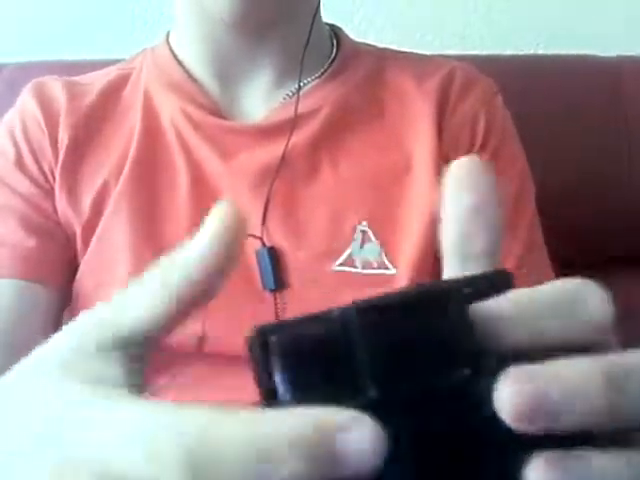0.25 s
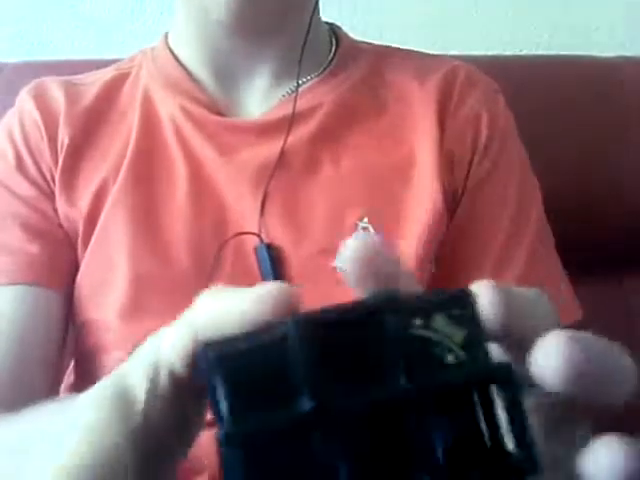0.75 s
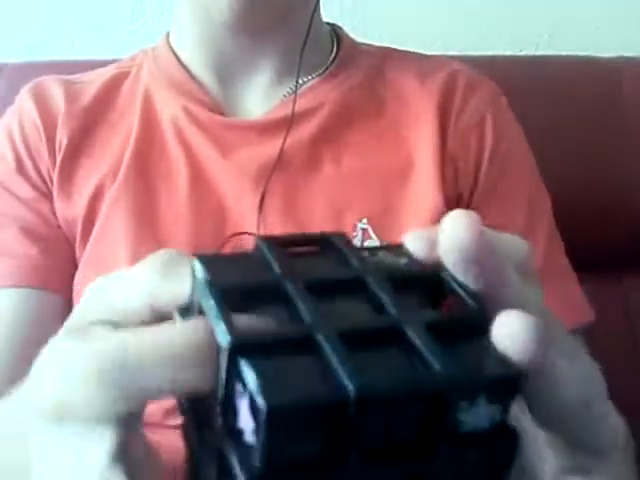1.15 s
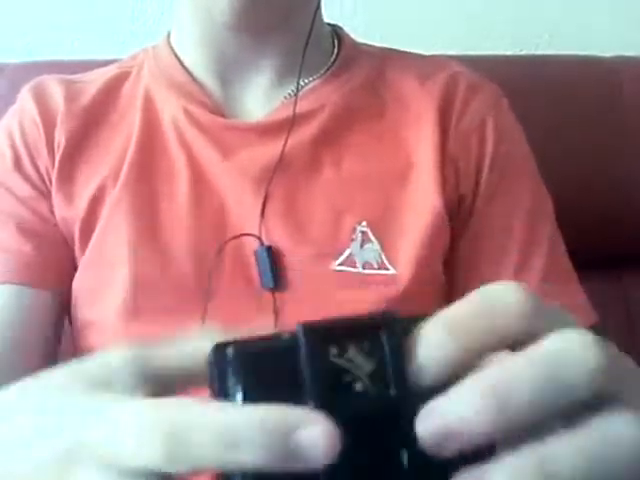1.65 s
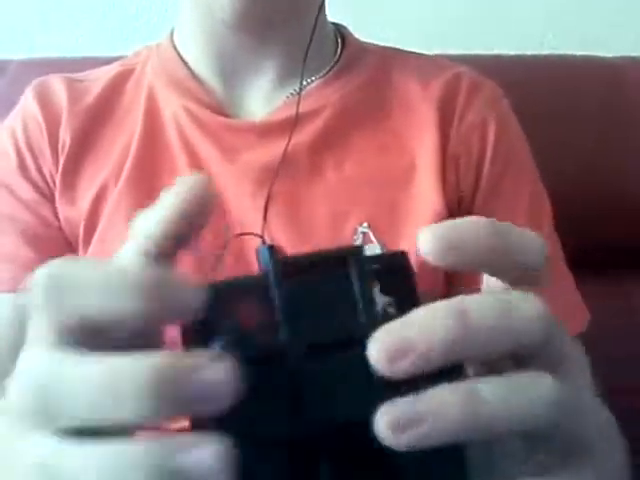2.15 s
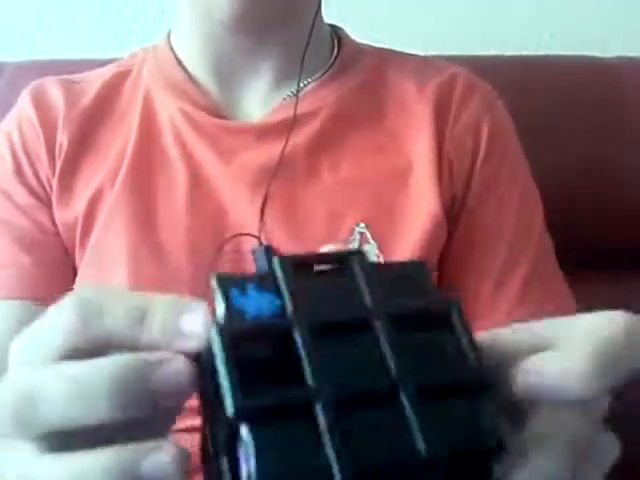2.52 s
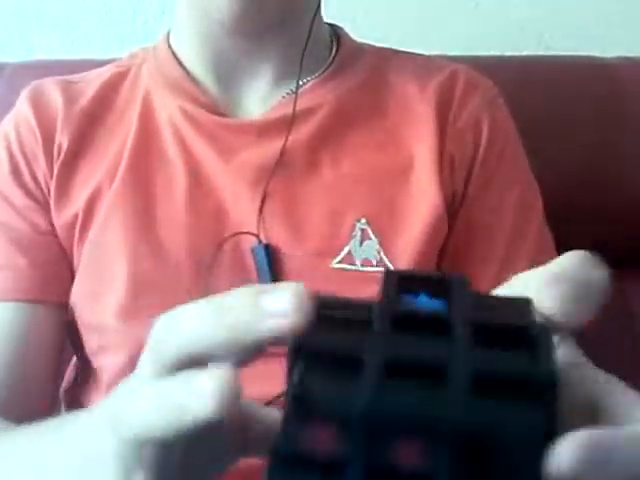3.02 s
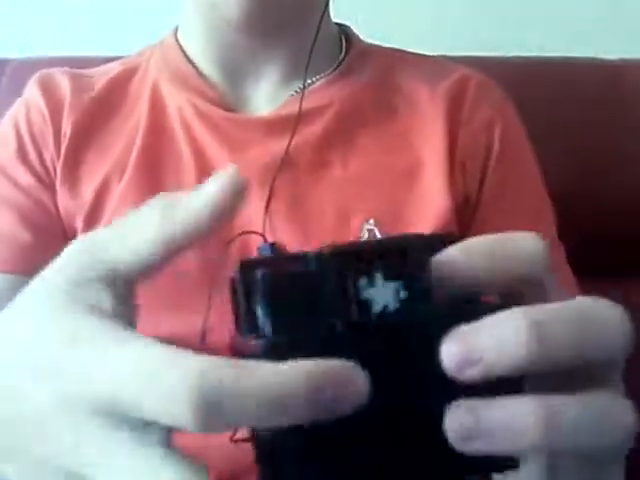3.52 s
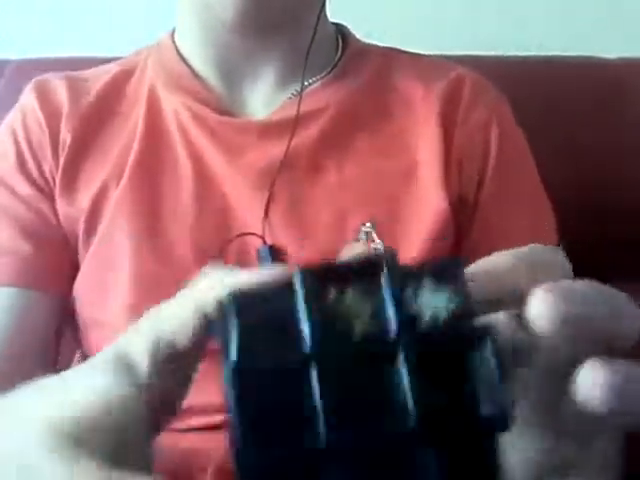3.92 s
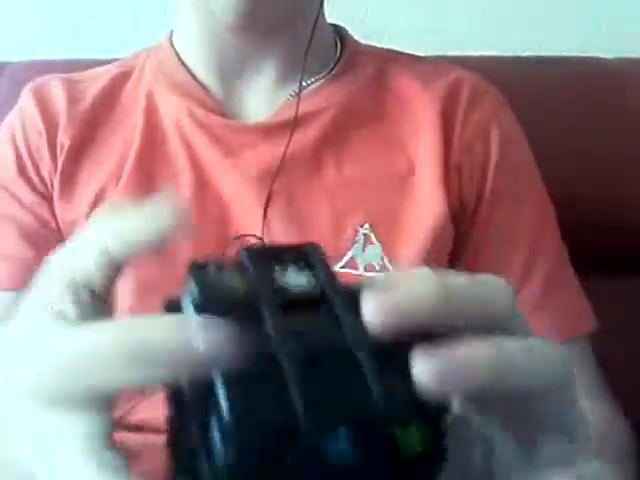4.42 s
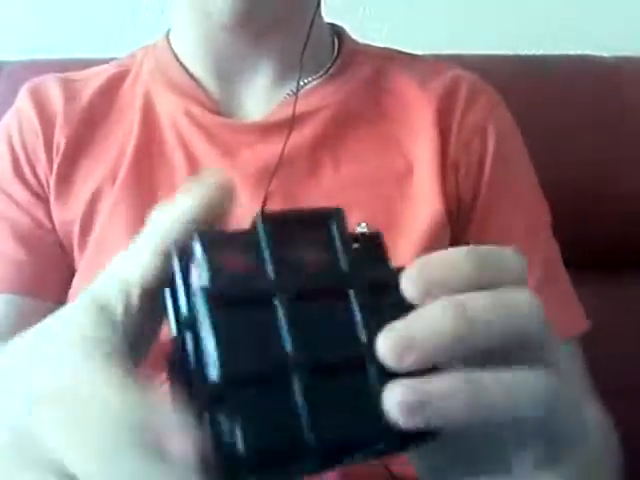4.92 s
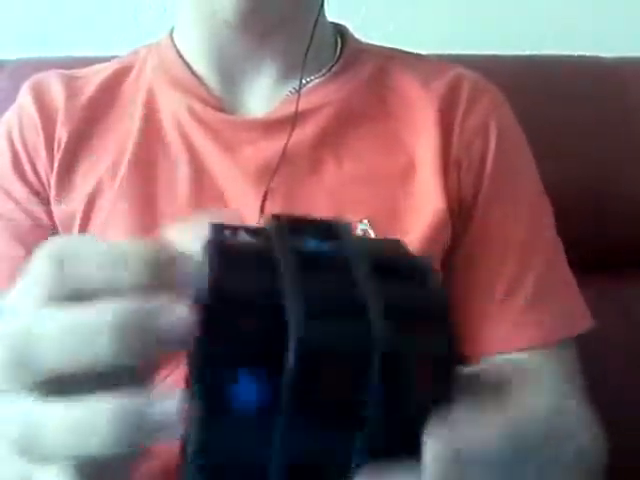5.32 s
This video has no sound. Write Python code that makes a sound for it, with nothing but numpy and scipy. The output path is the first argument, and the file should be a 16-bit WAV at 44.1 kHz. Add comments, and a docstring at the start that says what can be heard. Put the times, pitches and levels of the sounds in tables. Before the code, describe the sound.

Sharp plastic clacks come in irregular bursts as hands twist a cube puzzle right by the microphone. The turns are spaced at first, then crowd into busier chattering runs, with a hard snap near the end. Loose pieces rattle faintly in between, and a few turns carry a dull thump. The living room adds a soft echo and a steady low hum.

```python
"""A living room, a small microphone close to a hollow plastic cube puzzle being turned by hand.
Its pieces snap into place and knock each other in short chatters that ring the hollow, faces and edges.
Loose pieces rattle between turns, and now and then the whole cube jolts in the hands with a low thump.
Behind it the room answers with a long soft tail over a low hum; the loudest snaps overload the recorder."""
import sys
import numpy as np
from scipy import signal
from scipy.fft import rfft, irfft, next_fast_len
from scipy.io import wavfile

SR = 44100
rng = np.random.default_rng(int(sys.argv[2]) if len(sys.argv) > 2 else 0)


def persist_wave(psi):
    """Save psi, clipped to +-1, as 16-bit WAV."""
    counts = np.round(np.clip(psi, -1, 1) * 32767).astype(np.int16)
    wavfile.write(sys.argv[1], SR, np.atleast_2d(counts).T)


N = 245195

# resonances of the cube's hollow and faces: (frequency [Hz], width [Hz], gain [dB])
HOLLOW_MODES = [(256, 970, -21), (436, 367, -12), (1037, 590, -4.5), (1314, 248, 3), (1446, 136, 0),
                (1723, 425, -3)]
FACE_MODES = [(2223, 636, -0.5), (3070, 280, 2.5), (3310, 453, -1.5), (3934, 536, -3.5)]
# resonances of its edges; the last, near 10 kHz, is the microphone's treble peak:
# (frequency [Hz], width [Hz], gain [dB])
EDGE_AND_MIC_MODES = [(4454, 673, 9), (5980, 1730, 1), (7710, 530, -1), (8130, 1370, -10), (10240, 560, -8)]


def amp(db):
    return 10 ** (np.asarray(db) / 20)


def unit_rms(x):
    return x / np.sqrt(np.mean(x ** 2) + 1e-20)


def along(points, hz):
    """A curve through (frequency [Hz], value) points on a log frequency axis."""
    point_hz, values = np.transpose(points)
    return np.interp(np.log(hz + 1), np.log(point_hz + 1), values)


def filtered(x, response):
    """x through a complex frequency response."""
    size = next_fast_len(N + SR // 2)
    return irfft(rfft(x, size) * response(np.fft.rfftfreq(size, 1 / SR)), size)[..., :N]


def impulses(times, level_db):
    """One single-sample push at each time."""
    return np.bincount(np.round(times * SR).astype(int), amp(level_db), N)[:N]


def resonance(f, hz, width):
    """Band-pass response of one damped resonance."""
    return 1j * f * width / (hz * hz - f * f + 1j * f * width)


def modes(f, table):
    """Response of a row of resonances, alternating in sign."""
    return sum((-1) ** k * amp(db) * resonance(f, hz, width) for k, (hz, width, db) in enumerate(table))


def rings(force, table):
    """A force played through a row of resonances."""
    return filtered(force, lambda f: modes(f, table))


def room_tone():
    """The steady low hum and hiss of the living room."""
    # noise spectrum: (frequency [Hz], relative density [dB])
    spectrum = [(15, -1.5), (30, -7), (50, 6), (80, -5), (120, -4), (200, -7), (400, -12), (1000, -11.5),
                (2500, -21.5), (4500, -33), (9000, -31.5), (11500, -78)]
    return amp(-42.5) * unit_rms(filtered(rng.standard_normal(N), lambda hz: amp(along(spectrum, hz))))


def rattle(ticks_per_s=700):
    """Loose pieces and sliding faces send faint random ticks through the whole body."""
    # loudness of the rattle: (time [s], level [dB])
    envelope = [(0, -36.5), (.22, -55), (.75, -50), (.93, -41.5), (1.15, -52), (1.44, -42.5), (1.8, -42.5),
                (2.11, -45), (2.35, -52.5), (2.5, -41.5), (2.72, -46), (3.22, -35.5), (3.41, -47),
                (3.76, -50.5), (4.4, -39), (4.85, -38), (5.3, -66.5), (5.56, -40.5)]
    times, level_db = np.transpose(envelope)
    ticks = (rng.random(N) < ticks_per_s / SR) * rng.standard_normal(N)
    ticks *= amp(6.4 * rng.standard_normal(N))  # a few stand out
    body = (rings(ticks, HOLLOW_MODES) * amp(4) + rings(ticks, FACE_MODES)
            + rings(ticks, EDGE_AND_MIC_MODES) * amp(-16))
    return amp(np.interp(np.arange(N) / SR, times, level_db)) * unit_rms(body)


def room_tail(x, delay_samples=130):
    """The room's answer: each frequency dies at its own speed, in a new tail every third of a second."""
    # reverberation: (frequency [Hz], time to fall 60 dB [s])
    decay_times = [(200, 0.077), (530, 0.13), (1400, 0.58), (3700, 0.68), (10000, 0.67)]
    out, step = np.zeros(N + 2 * SR), SR // 3
    for start in range(0, N, step):
        hz, t, noise = signal.stft(rng.standard_normal(SR), SR, nperseg=256)
        late = amp(-60 * t / along(decay_times, hz)[:, None])
        early = amp(10 - 60 * t / 0.048)  # near surfaces answer first
        tail = signal.istft(noise * (late + early), SR, nperseg=256)[1][:SR]
        wet = signal.fftconvolve(x[start:start + step], tail / np.linalg.norm(tail))
        out[start + delay_samples:][:len(wet)] += wet
    return out[:N]


def knocks_into_room(strikes):
    """Averaged over all directions, each knock reaches the room as one smooth blow."""
    opening_snap = [[0.0024], [-10], [-22], [-10.5]]  # just gone: only its tail is in the air
    times, level_db, hollow_db, edge_db = np.hstack([opening_snap, strikes[:4]])
    return (rings(impulses(times, level_db + hollow_db + 31.5), HOLLOW_MODES)
            + rings(impulses(times, level_db + 25.5), FACE_MODES)
            + rings(impulses(times, level_db + edge_db + 19), EDGE_AND_MIC_MODES))


def contacts():
    """Each piece knocks, then rebounds once: rows of time, level, hollow, edge and face pitch."""
    # piece on piece: (time [s], level [dB], hollow over level [dB], edges over level [dB])
    blows = [(.1874, -31.5, 5.5, -2.5), (0.2255, -25.5, -7, -13), (.239, -33, -20, -8),
             (0.3408, -5, -5.5, -6.5), (0.3683, -18.5, 1, -8), (0.3758, -8.5, -6, 0.5),
             (0.3775, -5, -11, -9.5), (.3829, -22, -7, -25), (.491, -21, -8, -47),
             (0.542, -23.5, -4, -23.5), (0.567, -31.5, -7, -25), (0.7118, -12, -10, -9.5),
             (.810, -16, -3.5, -13), (0.8277, -14.5, -4.5, -12), (0.8335, -7.5, -16, -13),
             (0.8421, -15, -5, -7), (0.8562, -21, -3, -14.5), (0.8669, -6.5, -5.5, -7.5),
             (0.9845, -26, -2.5, -42), (1.0192, -16.5, -3, -12), (1.0427, -30, 2, -5),
             (1.078, -29.5, 2, -4.5), (1.1187, -19, -4, -13.5), (1.2248, -22, -5, -17),
             (1.27, -18, -4.5, -20), (1.3091, -14, -3.5, -18), (1.3201, -7, -1, -11.5),
             (1.3225, -4, -10.5, -14.5), (1.334, -18.5, -8, -8), (1.3451, -23.5, -7, 0),
             (1.408, -29, -2, -12), (1.4905, -25.5, -2.5, -22), (1.5123, -17, -11, -8.5),
             (1.5279, -19, -6.5, -8), (1.5472, -6.5, -9, -10), (1.561, -13.5, -2, -9),
             (1.5752, -24.5, -2, -3), (1.619, -17, -9.5, -16), (1.699, -20, -5.5, -7),
             (1.734, -23.5, -21, -15), (1.7948, -22, -8.5, -13), (1.803, -24, 0.5, -9),
             (1.8098, -20.5, -14, -16), (1.817, -16.5, -8.5, -16), (1.8763, -19, -8, -13),
             (1.881, -25, 0, -8), (1.8899, -16.5, 2, -7), (1.8945, -22.5, -21, -18), (1.9109, -27, -8, -7),
             (1.9698, -30.5, 1.5, -11), (2.007, -30.5, -14, -8), (2.0392, -24, -7, -29),
             (2.0512, -25, -1.5, -14), (2.1382, -29, -1.5, -19), (2.3004, -21, -5, -12),
             (2.3094, -8, -5, -29), (2.3124, -22.5, 2, -2), (2.3488, -4, -6.5, -3),
             (2.3656, -18.5, -1, -20), (2.5362, -21, -10.5, -23.5), (2.5888, -24.5, 2.5, -15),
             (2.6641, -12.5, 0.5, -8), (2.679, -22.5, -12, -20), (2.7586, -29.5, -1.5, -9),
             (2.7804, -25, -10, -20), (2.806, -28, 1.5, -35), (2.8267, -4.5, -8.5, -6.5),
             (2.8909, -16.5, -12, -14), (2.8955, -19.5, -12, -10), (2.9714, -18, .5, -10),
             (2.977, -23.5, -8, -4), (2.9792, -9.5, -12, -9.5), (3.0028, -25, -9, -20),
             (3.0091, -20, -5, -13), (3.0314, -23, -13, -10), (3.0454, -5.5, -4, -3.5),
             (3.055, -29, -5, -4), (3.0748, -16.5, -32, -12), (3.1092, -21, -6, -16),
             (3.117, -23, -14, -17), (3.1286, -19, -10, -20), (3.1366, -19, -8, -19),
             (3.163, -19, -6, -8.5), (3.2155, -16, -9, -17.5), (3.2192, -20.5, -7, -5),
             (3.224, -18, -6, -21), (3.243, -18.5, -3, -10.5), (3.255, -26, 0, -19.5),
             (3.2855, -23, -5, -16), (3.2914, -21, -6, -5.5), (3.3, -14, -8.5, -29),
             (3.3248, -20.5, -6, -24), (3.3326, -20.5, -4, -14), (3.357, -25.5, 0, -8),
             (3.3655, -18, -5.5, -14), (3.4, -17.5, -5, -10), (3.4028, -23, 2.5, -9),
             (3.4186, -22, -8, -9.5), (3.458, -24.5, -2, -15), (3.577, -21.5, -9.5, -15),
             (3.598, -24, -7, -21), (3.607, -22, 0, -17), (3.6122, -24.5, -2, -15), (3.633, -24, -2.5, -20),
             (3.6401, -23, -8, -7.5), (3.6645, -22.5, -3, -5), (3.6883, -32.5, -7, -4),
             (3.7665, -24, -9, -12), (3.8121, -21.5, -7, -26), (3.859, -28.5, -5.5, -19),
             (3.8732, -30, -7, -26), (3.9224, -18.5, -3, -4), (4.0028, -32, -5, -11),
             (4.035, -28.5, -1.5, -7), (4.0781, -18, -3.5, -2), (4.087, -7, -2, -4.5),
             (4.0912, -11, -14, -22), (4.1234, -26.5, -2, -20), (4.2295, -18, -3.5, -7.5),
             (4.237, -10.5, -7.5, -18), (4.2408, -15.5, -16, -8), (4.267, -27, -14, -49),
             (4.2688, -15, -6, -13), (4.279, -6, -3.5, -5), (4.307, -22, -15, -21), (4.3606, -23, -7, -17),
             (4.3947, -16.5, -7, -15), (4.403, -7, -3.5, -11), (4.4146, -14.5, -13, -11),
             (4.4444, -13.5, -7, -7), (4.46, -16, -2.5, -6.5), (4.4652, -17.5, -2, -6),
             (4.4706, -13.5, -6, -9), (4.4887, -10.5, -7.5, -7), (4.5015, -26, 0, -10),
             (4.5539, -22, -4, -8), (4.565, -21.5, -7, -20), (4.581, -26, -11, -15),
             (4.6544, -21.5, -6.5, -32), (4.6865, -23, -19, -13), (4.71, -11.5, -4.5, -8),
             (4.7195, -2, -6, -6.5), (4.7235, -8, -26, -14), (4.7285, -22.5, -12, 4),
             (4.791, -17.5, -11, -10), (4.8054, -20, -7.5, -9), (4.85, -32.5, 1, -10),
             (4.896, -27, -2, -10), (4.911, -26.5, -7.5, -14), (4.953, -27, -6, -25),
             (5.0135, -30.5, 2, -12), (5.0189, -25, -8, -23), (5.19, -17.5, -13, -12),
             (5.1938, -10.5, -19, -18), (5.199, -9.5, -6.5, -9.5), (5.2225, -16.5, -3, -3),
             (5.2252, -12.5, -11, -11), (5.2342, -2, -9.5, -9), (5.2472, -26, 2, 6),
             (5.4547, -23.5, -3.5, -21), (5.476, -33, -7, -14), (5.5264, -31.5, -1, -19),
             (5.5524, -20, -3, -8.5)]
    first = np.transpose(blows)
    chance = rng.random((len(blows), 2))[:, 0]
    scatter = rng.standard_normal((len(blows), 3))
    wait_s = .002 - .005 * np.log(1 - chance)
    rebound = first.copy()
    rebound[0] = np.minimum(first[0] + wait_s, (N - 1) / SR)
    rebound[1] += -5.5 - 900 * (rebound[0] - first[0]) - 1.5 * scatter[:, 0]  # the later, the weaker
    both = np.hstack([first, rebound])
    face_hz = 3180 + 10 * both[1] + 180 * scatter[:, 1:].T.ravel()  # harder blows sound higher
    return np.vstack([both, face_hz])


def struck_spots(table, count, scatter_db=2.5):
    """Each knock strikes another spot and wakes each resonance differently."""
    offset_db = scatter_db * rng.standard_normal((count, len(table)))
    return [(hz, width, db + offset_db[:, k:k + 1]) for k, (hz, width, db) in enumerate(table)]


def chatter(times, level_db, t60, response):
    """Each knock is a short scrape, then a dying run of uneven micro-impacts."""
    size, lead = 2048, 256  # samples: the whole knock, the part before contact
    t = (np.arange(size) - lead) / SR
    hits = rng.standard_normal((len(times), size)) * amp(4.4 * rng.standard_normal((len(times), size)))
    hits[:, lead + 12] += amp(16.5 + 0.1 * level_db)  # first contact: one clean blow, cleaner when hard
    scrape = amp(-22 + 60 * t / .02) * (t < 0)
    attack = (1 - np.exp(-np.abs(t) / 0.00036)) * (t >= 0)
    decay = amp(-60 * t / np.clip(t60[:, None], .001, .04))
    force = hits * (scrape + attack * decay)
    sound = irfft(rfft(force) * response(np.fft.rfftfreq(size, 1 / SR) + 1), size)
    onset = sound[:, lead:lead + 132]  # the first 3 ms set the level
    sound = sound * amp(level_db[:, None]) / np.sqrt(2 * np.mean(onset ** 2, axis=1, keepdims=True))
    at = np.round(times[:, None] * SR).astype(int) + np.arange(size)
    return np.bincount(at.ravel(), sound.ravel(), N + SR)[lead:lead + N]


def close_knocks(strikes):
    """Right at the microphone, every knock shakes hollow, faces and edges in its own proportions."""
    times, level_db, hollow_db, edge_db, face_hz = strikes
    count, force_db = len(times), level_db[:, None]
    t60 = 0.011 * amp(0.15 * level_db)  # harder blows chatter longer
    hollow_width = 7000 / (0.5 - 0.12 * force_db)  # hard blows also thump
    face_width = 900 - 35 * force_db  # light ticks ring broader
    edge_tilt = 1.7 + 0.098 * force_db  # hard blows reach higher
    hollow = lambda f: modes(f, struck_spots(HOLLOW_MODES, count)) * resonance(f, 1250, hollow_width)
    face = lambda f: (modes(f, struck_spots(FACE_MODES, count))
                      * resonance(f, face_hz[:, None], face_width))
    edge = lambda f: modes(f, struck_spots(EDGE_AND_MIC_MODES, count)) * (f / 6000) ** edge_tilt
    return (chatter(times, level_db + hollow_db, 0.96 * t60, hollow)
            + chatter(times, level_db, t60, face)
            + chatter(times, level_db + edge_db, 2.1 * t60, edge))


def thumps():
    """The whole cube jolts in the hands: one low, heavily damped push each time."""
    # jolts of the cube: (time [s], level [dB])
    jolts = [(.3777, -31), (0.8675, -32), (1.3203, -10), (2.3488, -14), (2.5875, -32), (2.6637, -30),
             (2.827, -24), (3.0451, -20), (4.279, -21), (4.403, -32), (4.7188, -13), (5.2338, -32)]
    times, level_db = np.transpose(jolts)
    return filtered(impulses(times, level_db + 26), lambda f: resonance(f, hz=350, width=500) ** 2)


def scene():
    """One microphone: the cube close up, the room's tail and hum behind it."""
    strikes, loose = contacts(), rattle()
    tail = room_tail(knocks_into_room(strikes) + amp(-2.5) * loose)
    return (close_knocks(strikes) + thumps() + loose + tail + room_tone())[None]


def record(dry):
    """The recorder flattens the loudest snaps near full scale and cuts off the top treble."""
    gain_db, ceiling, top_hz = -1.35, .985, 10800
    driven = amp(gain_db) * dry
    flattened = driven / (1 + np.abs(driven / ceiling) ** 8) ** (1 / 8)
    return filtered(flattened, lambda hz: 1 / (1 + (hz / top_hz) ** 80))


dry = scene()
out = record(dry)
persist_wave(out)
```